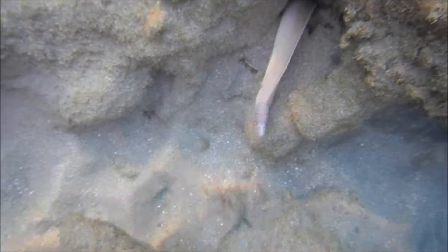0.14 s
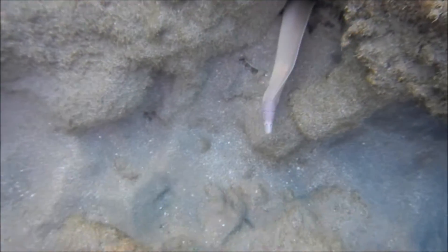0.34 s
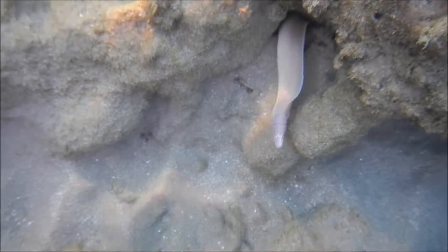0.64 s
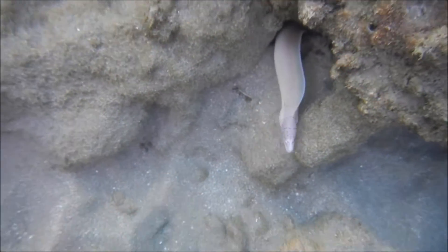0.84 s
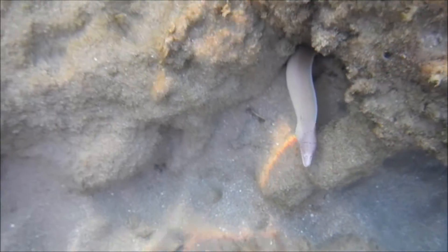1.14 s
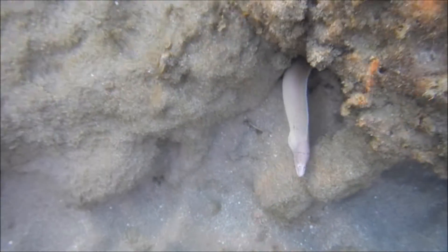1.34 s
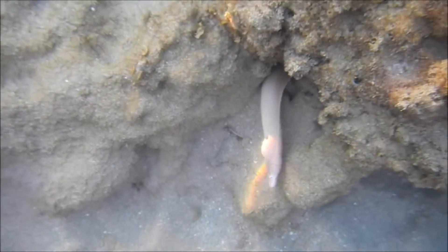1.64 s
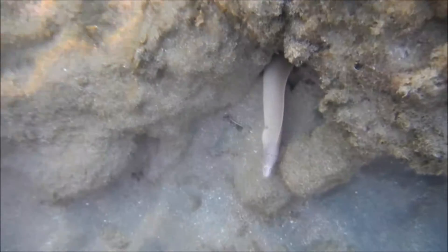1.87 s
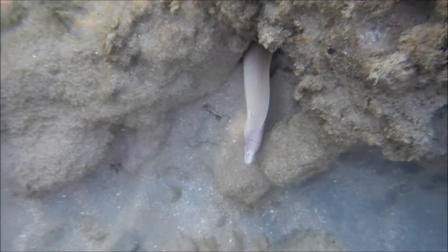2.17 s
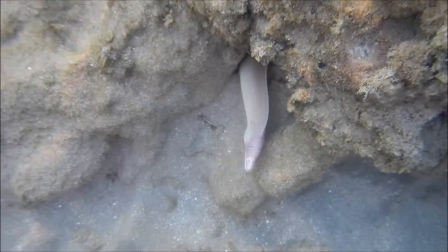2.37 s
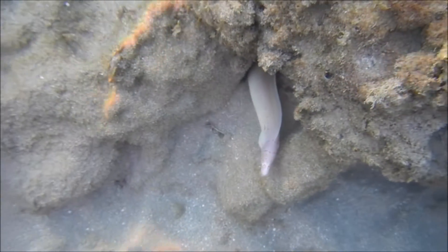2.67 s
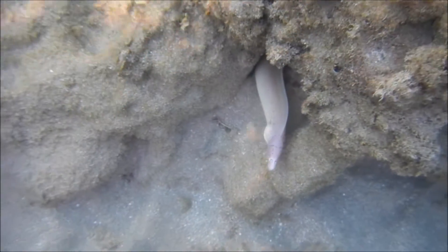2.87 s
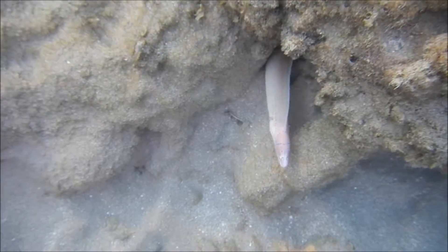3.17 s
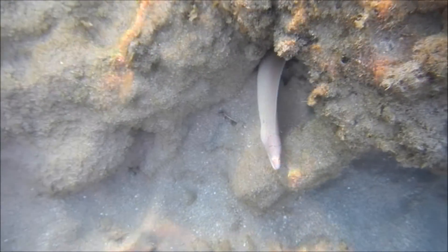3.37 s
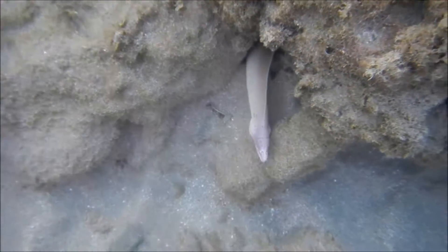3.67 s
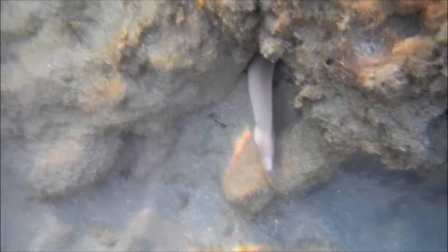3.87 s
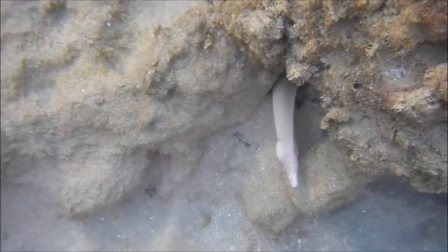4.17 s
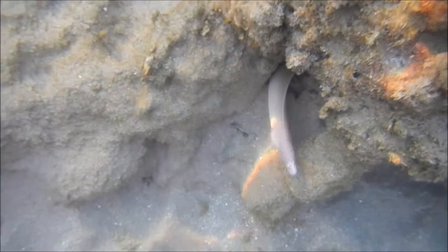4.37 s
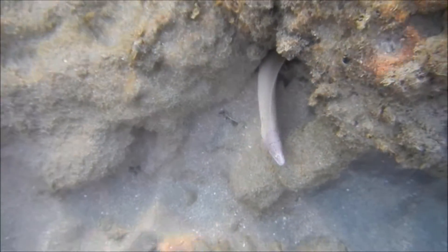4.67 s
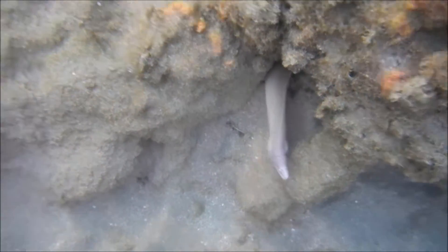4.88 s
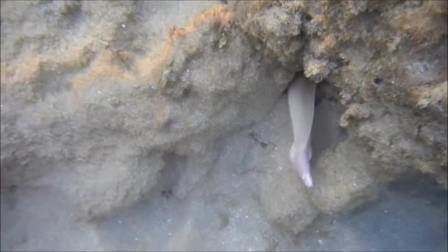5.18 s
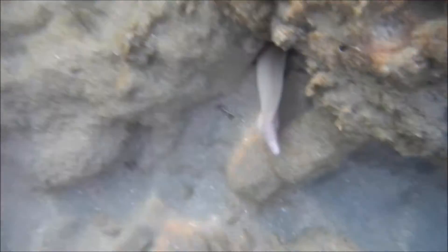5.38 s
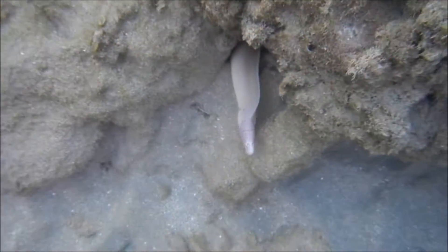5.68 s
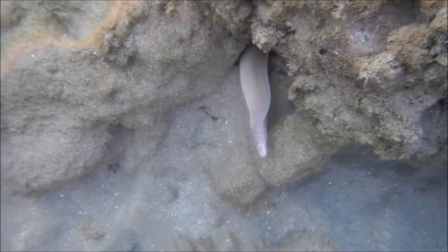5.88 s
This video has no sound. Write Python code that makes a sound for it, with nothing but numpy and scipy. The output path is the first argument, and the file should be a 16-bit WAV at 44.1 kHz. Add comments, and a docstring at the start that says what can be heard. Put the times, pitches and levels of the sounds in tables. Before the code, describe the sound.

Underwater, a distant boat engine whines over dull reef wash and crackle, with knocks and sharp raps on the camera housing.

```python
"""Knocks and two brief gurgles on a camera housing under water, over the whine of a far boat engine
(multiples of its firing rate) and the dull wash and crackle of a reef. Knocks, taps and reef snaps
ring the modes of the housing's shell, panel and case. Hard raps overload the input; after most of
them the background and soft touches sink and slowly climb back, deeply near the end, where the
case is also scraped once and small bright pings ring."""
import sys
import numpy as np
from scipy import signal
from scipy.fft import rfft, irfft, next_fast_len
from scipy.io import wavfile

SR = 44100
rng = np.random.default_rng(int(sys.argv[2]) if len(sys.argv) > 2 else 0)


def to_wav(s):
    """Save 16-bit WAV."""
    ch = np.atleast_2d(s).T  # columns
    pcm = np.round(np.clip(ch, -1, 1) * 32767)  # PCM
    wavfile.write(sys.argv[1], SR, pcm.astype(np.int16))


N = 265437

# Phase between the two ports. Each row: frequency in Hz, left lead in rad.
PORT_LEAD = [(100, 0), (220, 0), (400, -.9), (480, -.5), (560, 1.6), (690, .8), (780, 0), (1030, -1),
             (1290, 1), (1940, 1.2), (2500, 3)]
# Hard raps. Each row: start in seconds, shell, panel, case and tick drive in dB, sink depth in dB.
HARD_RAPS = [(0.061, -39, -35, -16, -35, 0), (1.187, -7, -5.5, -19, -40.5, -3),
             (1.288, -14, -22, -35, -40.5, 3), (3.747, -4, -7.5, -16.5, -33, -7.5),
             (4.008, -9.5, -8, -19.5, -40.5, -5), (4.21, -6, -5, -18, -37.5, -6.5),
             (4.438, -13.5, -3.5, -19.5, -37, -2), (4.571, -13, -8, -21, -40.5, -10.5),
             (4.8948, -5.5, -17.5, -21, -27.5, -23), (5.0427, -5.5, -15.5, -18.5, -33.5, -28.5),
             (5.3168, -1.5, -11, -18, -31.5, -30), (5.4053, -15, -14.5, -31, -54, -31)]


def from_db(db):
    return 10 ** (np.asarray(db) / 20)


def rms_one(x):
    return x / np.sqrt(np.mean(x ** 2) + 1e-20)


def at_hz(points, hz):
    """Interpolate (Hz, value) rows over log frequency."""
    p = np.array(points, float)
    return np.interp(np.log(hz), np.log(p[:, 0]), p[:, 1])


def butterworth(x, order, hz, kind="low"):
    return signal.sosfilt(signal.butter(order, hz, kind, fs=SR, output="sos"), x)


def drift(rate_hz):
    """Slow random wander of rms 1: noise twice through a one-pole low-pass."""
    r = np.exp(-80 * np.pi * rate_hz / SR)
    slow = signal.lfilter([1], [1, -2 * r, r * r], rng.standard_normal(N // 40 + 2002))[2000:]
    return np.interp(np.arange(N) / 40, np.arange(len(slow)), rms_one(slow))


def ring(clicks, hz, t60_s):
    """Two equal resonators in series: a unit click swells, peaks near 1 and dies."""
    r, w = from_db(-60 / (t60_s * SR)), 2 * np.pi * hz / SR
    section = [0, np.sin(w), 0, 1, -2 * r * np.cos(w), r * r]
    return signal.sosfilt([section, section], clicks + 1e-18) * 2 * np.e * (1 - r)


def stereo_noise(spectrum, coherence, flicker_db, bands):
    """Coloured noise of rms 1 in overlapping, flickering bands; the ports differ in level and phase."""
    # Port balance. Each row: frequency in Hz, left minus right in dB.
    balance = [(60, -1), (210, -0.5), (340, -1), (430, -6.5), (520, -10), (580, -22.5), (690, -2.5),
               (735, 0.5), (790, 0.5), (870, -8), (1040, -8), (1290, -3), (1500, -5), (1720, -5.5),
               (1940, -3), (2400, -1.5), (3500, 0.5)]
    size = next_fast_len(N)
    hz = np.maximum(np.arange(size // 2 + 1) * SR / size, 1)
    low_hz, high_hz = spectrum[0][0], spectrum[-1][0]
    shared, own = rfft(rng.standard_normal((2, size)))
    tilt = from_db(at_hz(balance, hz) / 2)
    alike = coherence(hz)
    right = alike * shared * np.exp(-1j * at_hz(PORT_LEAD, hz)) + np.sqrt(1 - alike ** 2) * own
    colour = from_db(at_hz(spectrum, hz)) * ((hz > low_hz) & (hz < high_hz))
    ports = np.array([shared * tilt, right / tilt]) * colour
    band_index = np.log(hz / low_hz) / np.log(high_hz / low_hz) * (bands - 1)
    together, out = drift(15), 0
    for k in range(bands):
        band = irfft(ports * np.clip(1 - abs(band_index - k), 0, 1), size)[:, :N]
        out = out + band * from_db(flicker_db * (together + (1 - k / bands) * drift(7.2)))
    return rms_one(out)


def housing(trains, sustain=1, scatter_db=0):
    """Click trains ring the shell, right-hand panel and whole case; the ports hear them out of phase."""
    # Modes. Each row: frequency in Hz, t60 in seconds, left gain in dB, right gain in dB.
    shell_modes = [(296, 0.014, -25, -35.5), (685, 0.021, -14, -13), (743.5, 0.023, -4, -6),
                   (824.3, 0.037, -15.5, -15.5), (1302, 0.02, -24, -20.5), (1806, 0.01, -24, -22.5)]
    panel_modes = [(479, 0.025, -21, -6), (524, 0.027, -20, -0.5), (651.4, 0.09, -22.5, -25.5),
                   (960, 0.024, -28, -23.5)]
    case_modes = [(57, 0.026, -7, -8.5), (104, 0.02, 2.5, 2.5), (180, 0.021, -11.5, -14)]
    out = np.zeros((2, N))
    for clicks, modes in zip(trains, (shell_modes, panel_modes, case_modes)):
        if not clicks.any():
            continue
        for hz, t60_s, left_db, right_db in modes:
            strikes = clicks * from_db(scatter_db * rng.standard_normal(N))
            mode = ring(strikes, hz, sustain * t60_s)
            lag_samples = round(at_hz(PORT_LEAD, hz) / (2 * np.pi * hz) * SR)
            out += [from_db(left_db) * mode, from_db(right_db) * np.roll(mode, lag_samples)]
    return butterworth(out, 2, hz=35, kind="high")   # removes the offset and deepest rumble


def electronics():
    """Faint input hiss and a thin steady tone, returned apart."""
    # Input noise. Each row: frequency in Hz, relative density in dB.
    hiss_spectrum = [(1500, 0.5), (4000, 3), (8000, 5.5), (14200, 2.5), (14500, -11.5), (15900, -10)]
    hiss_db, tone_db, tone_hz = -60.5, -67, 14835.2
    hiss = from_db(hiss_db) * stereo_noise(hiss_spectrum, lambda hz: .3, flicker_db=.4, bands=4)
    tone = np.sqrt(2) * np.sin(2 * np.pi * tone_hz * np.arange(N) / SR)
    return hiss, from_db(tone_db + .7 * drift(8)) * tone


def reef_wash():
    """Dull noise of the reef, coloured by the housing."""
    # Wash spectrum. Each row: frequency in Hz, relative density in dB.
    spectrum = [(20, -22), (60, -13.5), (120, -7), (200, -12), (275, -15.5), (345, -10), (420, -4),
                (470, -5.5), (505, -18), (545, -8.5), (620, -8), (690, -3.5), (745, -7.5), (810, -10.5),
                (870, -13), (1110, -28), (1270, -22), (1370, -21.5), (1450, -15.5), (1530, -24),
                (1650, -25), (1950, -29), (2450, -39.5), (3000, -40), (4000, -47.5), (7000, -57)]
    # Likeness of the ports. Each row: frequency in Hz, coherence from 0 to 1.
    coherence = [(60, .88), (170, .97), (420, .9), (510, .3), (600, .9), (950, .9), (1080, .5), (1500, .87),
                 (1940, .75), (2300, .35), (4000, .3)]
    wash = stereo_noise(spectrum, lambda hz: at_hz(coherence, hz), flicker_db=1.38, bands=15)
    return from_db(-23.5) * wash


def reef_crackle(snaps_per_s=84):
    """Small snaps of uneven size strike shell and panel; no two wake a mode alike."""
    sizes_db = 4.87 * np.minimum(rng.exponential(1, (2, N)), 2)
    snaps = from_db(sizes_db) * rng.choice([-1, 1], (2, N))
    shell, panel = snaps * (rng.random((2, N)) < snaps_per_s / SR)
    trains = [shell, from_db(-5.5) * panel, from_db(-23) * (shell + panel)]
    return from_db(-40.5) * housing(trains, scatter_db=2.5)


def boat_engine(firing_hz=59.93, shaft_hz=11.05, throb_depth=0.06):
    """Sines on the firing rate waver as the water path changes; the propeller shaft makes them throb."""
    # Engine orders. Each entry: multiple of the firing rate.
    multiples = [1, 2, 3, 6, 7, 9, 10, 11, 12, 13, 23, 27, 33, 35, 14, 15, 16]
    # One row per order: left level in dB, right level in dB, left lead in rad.
    orders = [(-45, -47, -1.1), (-52.5, -54, 1.8), (-52.5, -55, -0.7), (-41.5, -42.5, -1),
              (-44.5, -46.5, -0.4), (-55, -31, 3.5), (-42.5, -27.5, 5), (-27, -25, 0.96),
              (-42.5, -42, 10.5), (-52.5, -41.5, -1), (-63, -50.5, 0), (-64.5, -54, -4), (-75, -58.5, 6),
              (-75.5, -69, -4.5), (-45.5, -47.5, 1.2), (-52, -50, -1.5), (-58, -54.5, -0.5)]
    # Slow swell. Each row: time in seconds, gain in dB.
    swell = [(0, 2), (.5, 1), (1.3, 0.5), (2.0, 0), (2.6, 0.5), (3.1, -1), (3.35, 3.5), (3.55, 2),
             (3.8, -0.5), (6.02, -1.5)]
    t = np.arange(N) / SR
    firing_rad = 2 * np.pi * np.cumsum(firing_hz * (1 + 0.00038 * drift(1.12))) / SR
    out = np.zeros((2, N))
    for multiple, (left_db, right_db, lead_rad) in zip(multiples, orders):
        phase = multiple * firing_rad + rng.uniform(0, 2 * np.pi) + 0.068 * drift(10)
        waver = np.sqrt(2) * from_db(0.9 * drift(4.2))
        out += waver * [from_db(left_db) * np.sin(phase + lead_rad), from_db(right_db) * np.sin(phase)]
    out *= from_db(np.interp(t, *np.transpose(swell)))
    return out * (1 + throb_depth * np.sin(2 * np.pi * shaft_hz * t))


def gurgles():
    """Soft, lumpy tones that swell, glide and fade."""
    # Each row: start and end in seconds, first and last pitch in Hz, level in dB.
    glides = [(0.07, 0.19, 112, 160, -25), (0.06, 0.17, 600, 470, -24)]
    out = 0
    for start_s, end_s, from_hz, to_hz, db in glides:
        along = np.clip((np.arange(N) / SR - start_s) / (end_s - start_s), 0, 1)
        phase = 2 * np.pi * np.cumsum(from_hz + (to_hz - from_hz) * along) / SR
        arch = np.sqrt(np.abs(np.sin(np.pi * along)))
        out = out + from_db(db + 2.4 * drift(25)) * arch * np.sin(phase)
    return out


def pings(grit_s=.0015):
    """Short gritty contacts each set off one brief, bright ring."""
    # Each row: start in seconds, pitch in Hz, level in dB, t60 in seconds.
    contacts = [(4.892, 3000, -34, 0.006), (4.909, 2400, -30, 0.005), (4.921, 2500, -30.5, 0.01),
                (4.923, 3800, -45, 0.0069), (5.315, 2790, -27, 0.0077), (5.4052, 3130, -21.5, 0.0028),
                (5.0425, 1830, -23, 0.0026), (1.5, 5400, -44, 0.004), (5.421, 3000, -50, .004),
                (5.532, 2770, -54, 0.0048)]
    out = np.zeros((2, N))
    fade = np.exp(-np.arange(N // 40) / (grit_s * SR))
    for start_s, hz, db, t60_s in contacts:
        grit = fade * rng.standard_normal((2, len(fade))) / np.linalg.norm(fade)
        start = int(start_s * SR)
        out[:, start:start + len(fade)] += from_db(db) * ring(grit, hz, t60_s)
    return out


def scrape(start_s=4.84, peak_s=4.886, end_s=4.96, slips_per_s=9000):
    """Something slides along the case in dense, bright slips, catching and shoving it."""
    # Shoves on the case. Each row: start in seconds, drive in dB.
    catches = [(4.87, -19), (4.877, -28)]
    envelope = np.interp(np.arange(N) / SR, [start_s, peak_s, end_s], [0, 1, 0]) ** 3
    slips = rng.standard_normal((2, N)) * (rng.random(N) < slips_per_s / SR) * envelope
    bright = butterworth(slips, 1, [1300, 3300], "band")
    bright = butterworth(bright, 1, 5000)
    shoves = np.zeros((3, N))
    for catch_s, db in catches:
        shoves[2, int(catch_s * SR)] = from_db(db)
    return from_db(-20) * bright + housing(shoves)


def impacts(rows, sustain, tick_db, tick_s, top_hz, order, scatter_db=0):
    """Each impact rings the housing; a bright contact tick follows and dies as a faint rattle."""
    rattle_s, tick_delay_s = .011, .0009
    start_s, *levels_db = np.transpose(rows)
    polarity = [[-1], [-1], [1], [1]]   # the wall dents while the case is pushed
    trains = np.zeros((4, N))   # shell, panel, case, tick
    trains[:, (start_s * SR).astype(int)] = from_db(levels_db) * polarity
    contact, rattle = [signal.lfilter([1], [1, -np.exp(-1 / (decay_s * SR))], trains[3])
                       for decay_s in (tick_s, rattle_s)]
    common, left, right = rng.standard_normal((3, N))
    burst = (contact + .11 * rattle) * (common + np.array([left, right]))
    tick = butterworth(burst, 1, [1600, 3400], "band")
    tick = butterworth(tick, order, top_hz)
    tick = np.roll(tick, int(tick_delay_s * SR), axis=1)
    return housing(trains[:3], sustain, scatter_db) + from_db(tick_db) * tick


def soft_touches(rebound_s=.0095):
    """Shell knocks, each rebounding twice, and panel taps; each passes some drive to the other parts."""
    # Each row: start in seconds, shell drive in dB, rebounds relative to it in dB.
    knocks = [(0.001, -2.5, -8.5), (0.058, 0, -7.5), (0.391, -7, -35), (0.42, 0, -4), (0.725, -12.5, -28),
              (1.465, -14, -3.5), (2.229, -4.5, -28), (2.26, -3, -4.5), (2.272, -7.5, -13),
              (2.278, -5, -33), (2.288, -12.5, -24), (2.331, -12, -10), (2.462, -4, -26), (2.488, -2.5, -8),
              (3.738, -9.5, -28), (3.800, -4.5, -8), (4.056, -5.5, -35.5), (4.068, -17, -15),
              (4.091, 1, -10.5), (4.143, -3.5, -27), (4.178, -5.5, -9), (4.594, -4.5, -30), (4.629, -1, -2),
              (4.696, 1, -5), (4.859, -6.5, -2), (4.8795, -6.5, 0), (4.964, -7.5, -25), (5.028, 1, 4.5),
              (5.067, 1.5, -8), (5.268, -2, -0.5), (5.55, -23, -24.5), (5.57, -8, 2), (5.59, -6.5, -24),
              (5.648, -12, -14), (5.665, -6.5, 0), (5.793, -10, -2.5)]
    # Each row: start in seconds, panel drive in dB.
    taps = [(0.066, -11), (0.135, -15), (0.19, -9), (0.42, -11.5), (0.724, -22), (0.863, -6),
            (1.113, -22.5), (1.351, -10.5), (1.552, -15.5), (1.677, -14), (1.911, -13), (2.017, -20.5),
            (2.119, -13), (2.506, -12), (3.451, -23), (3.864, -14), (3.909, -13.5), (3.981, -10.5),
            (4.367, -17), (4.496, -29.5), (5.117, -9), (5.215, -2.5), (5.227, -6), (5.532, -4)]
    hits = [(s, db) for s, db, _ in knocks]
    for s, db, rebound_db in knocks:
        for bounce in (1, 2):
            delay_s = rebound_s * (bounce + 0.11 * rng.uniform(-1, 1))
            hits.append((s + delay_s, db + rebound_db))
    # Each row: start in seconds, shell, panel, case and tick drive in dB.
    rows = [(s, db, db - 19, db - 22, db - 40) for s, db in hits]
    rows += [(s + 0.00098, db - 8, db, db - 18.5, db - 37.5) for s, db in taps]
    return impacts(rows, sustain=0.96, tick_db=6.5, tick_s=0.004, top_hz=2800, order=3, scatter_db=1.5)


def hard_raps():
    """Raps ring the housing, damped by the hand, and wake a few stiff modes that crack."""
    # Each row: frequency in Hz, t60 in seconds, level relative to the shell drive in dB.
    stiff_modes = [(1147, 0.0072, -12.5), (1413, 0.0074, -15.5), (1946, 0.0038, -27)]
    raps = np.array(HARD_RAPS)
    body = impacts(raps[:, :5], sustain=0.66, tick_db=12.5, tick_s=0.0009, top_hz=9000, order=1)
    clicks = np.zeros(N)
    clicks[(raps[:, 0] * SR).astype(int)] = -from_db(raps[:, 1])
    return body + sum(from_db(db) * ring(clicks, hz, t60_s) for hz, t60_s, db in stiff_modes)


def sinking_db(sink_s=0.012, recover_db_per_s=14):
    """Gain drops to each rap's depth, if negative, and climbs back steadily; the deepest dip rules."""
    raps = np.array(HARD_RAPS)
    since_s = np.arange(N) / SR - raps[:, :1]
    dips_db = np.where(since_s > 0, raps[:, 5:] + recover_db_per_s * since_s, 0)
    r = np.exp(-1 / (sink_s * SR))
    return signal.lfilter([1 - r], [1, -r], np.minimum(dips_db.min(axis=0), 0))


def scene():
    """Background and soft touches sink after raps, the treble deepest; raps, scrape and pings do not."""
    treble_hz, treble_gate_db = 2600, -12
    wash = reef_wash()
    hiss, tone = electronics()
    touches = soft_touches()
    raps = hard_raps()
    water = boat_engine() + wash + reef_crackle() + touches + gurgles()
    dull = signal.sosfiltfilt(signal.butter(3, treble_hz, fs=SR, output="sos"), water)
    gain_db = sinking_db()
    gain = from_db(gain_db)
    treble = gain ** 1.56 * (water - dull) + gain ** 1.7 * hiss + gain ** 1.1 * tone
    treble_gate = 1 / (1 + from_db(9 * (treble_gate_db - gain_db)))
    return gain * dull + treble_gate * treble + raps + scrape() + pings()


def record(dry):
    """Hard raps flatten against the ceiling of the input; a steep low-pass cuts the top."""
    ceiling, cutoff_hz = .85, 16100
    flat = dry / (1 + (np.abs(dry) / ceiling) ** 8) ** (1 / 8)
    return signal.sosfilt(signal.cheby2(20, 60, cutoff_hz, fs=SR, output="sos"), flat)


dry = scene()
out = record(dry)
to_wav(out)
```